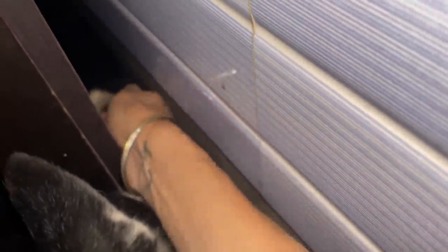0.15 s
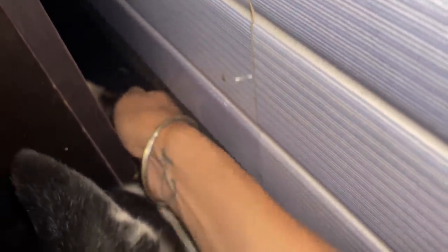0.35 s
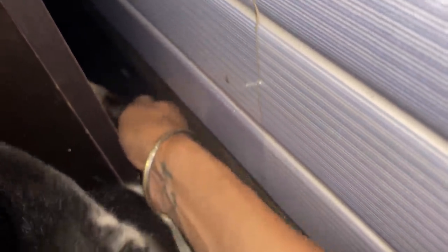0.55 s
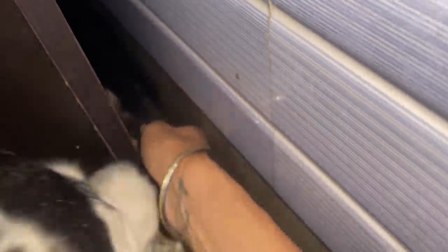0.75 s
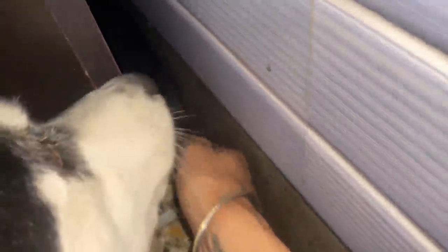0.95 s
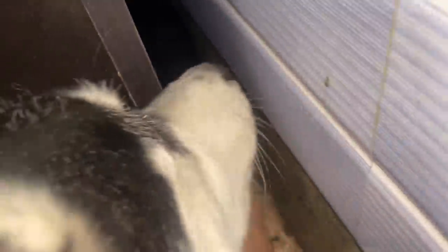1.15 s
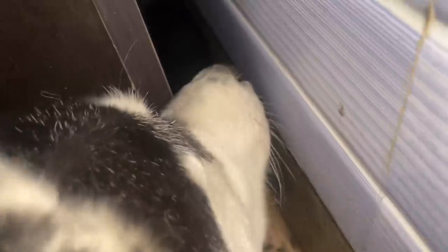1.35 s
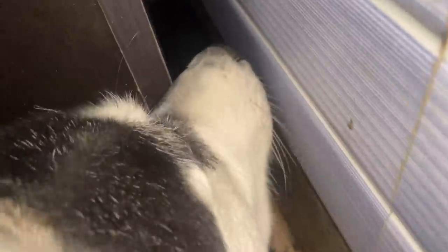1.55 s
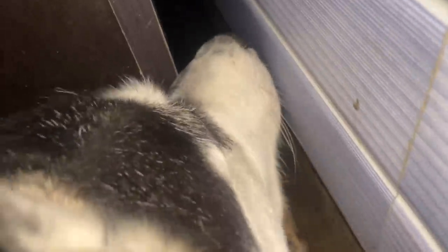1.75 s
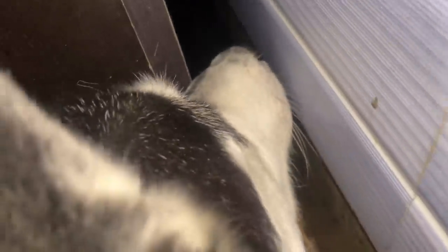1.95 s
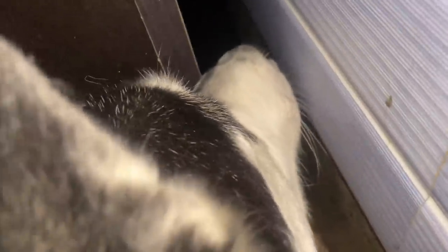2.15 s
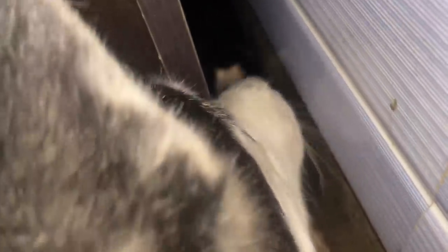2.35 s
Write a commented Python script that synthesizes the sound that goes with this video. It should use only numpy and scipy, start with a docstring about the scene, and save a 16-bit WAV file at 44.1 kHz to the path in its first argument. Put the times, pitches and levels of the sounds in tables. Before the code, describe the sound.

A very young puppy gives a long high squeal that turns clear then raspy, while a wooden panel is bumped softly; a faint peep leads to a second shorter cry. Close stereo microphone, quiet room.

```python
"""A newborn puppy, stuck in a narrow gap between furniture and a wall, squeals twice: the first cry starts
period-doubled, turns clear, then breaks into a rasp; a faint peep leads into the second. Uneven fold pulses
pass through throat and mouth, with hissing breath beside them. A bumped wooden panel shudders as decaying
modes, a claw ticks on the floor, and filtered noise makes the quiet room and the rumble of movement."""
import sys
import numpy as np
from scipy import signal
from scipy.fft import rfft, irfft, next_fast_len
from scipy.io import wavfile
from scipy.ndimage import uniform_filter1d, minimum_filter1d, map_coordinates

SR = 44100
rng = np.random.default_rng(int(sys.argv[2]) if len(sys.argv) > 2 else 0)


def generate_wav(sig):
    """Save sig (samples, or channels by samples) to the path in sys.argv[1] as 16-bit PCM at SR."""
    pcm = np.round(np.clip(np.atleast_2d(sig).T, -1, 1) * 32767).astype(np.int16)
    wavfile.write(sys.argv[1], SR, pcm)


def volts_from_decibels(level):
    """Turn decibel levels (scalar or array-like) into linear amplitude factors."""
    exponent = np.asarray(level, float) / 20
    return 10 ** exponent


N = 105840


def unit(x):
    """Scale to rms 1."""
    return x / np.sqrt(np.mean(x ** 2) + 1e-20)


def along(points, hz):
    """Read (Hz, value) points on a log frequency axis."""
    f, v = np.transpose(points)
    return np.interp(np.log(hz + 1), np.log(f + 1), v)


def curves(rows):
    """One value per sample for each column after the time."""
    s, *cols = np.transpose(rows)
    return [np.interp(np.arange(N) / SR, s, c) for c in cols]


def wobble(rate):
    """A smooth random curve, rate knots a second."""
    return map_coordinates(rng.standard_normal(N // 8), [np.arange(N) * rate / SR])


def filtered(x, response):
    """Multiply the spectrum of x by a complex response of frequency."""
    m = next_fast_len(N + SR // 2)
    return irfft(rfft(x, m) * response(np.fft.rfftfreq(m, 1 / SR)), m)[..., :N]


def cry(pitch_rows, level_rows, count=24):
    """Fold pulses, uneven in time and size when irregular, through the throat; the mouth sets six band levels."""
    # state of the vocal folds: time_s, irregularity (0-1), every_second_pulse (depth), flutter (0-1)
    folds = [(0, .16, 4, .1), (.05, .09, 3, .1), (.125, .09, 1.5, 0), (.14, .08, .05, .1),
             (.24, .04, .02, .05), (.3, .01, 0, 0), (.815, .01, 0, 0), (.84, .16, 0, .2), (.89, .12, 0, .6),
             (.93, .3, 0, .8), (.955, .06, 0, .1), (.97, .18, 0, .8), (1.04, .18, 0, .8),
             (1.08, .08, 0, .4), (1.14, .35, 0, 1), (1.25, .55, 0, 1), (1.275, .03, 0, 0),
             (1.775, .6, 0, .3), (1.81, .5, 0, .3), (1.83, .05, 0, 0), (1.88, .04, .05, 0),
             (1.91, .09, .08, .1), (1.95, .02, 0, 0), (2.25, .012, 0, 0), (2.4, .025, 0, 0)]
    # resonances of the throat, relative within each band: frequency_hz, level_db
    throat = [(300, -50), (600, -29), (950, -27.5), (1500, -7), (1800, 5), (2150, 6), (2550, 8),
              (2900, -11), (3150, -9.5), (4100, -11.5), (4700, 1), (5500, 0.5), (6400, -20.5),
              (7600, -47.5), (9000, -35), (11500, -44.5), (13000, -75), (16000, -106.5)]
    # crossovers between the six bands: frequency_hz
    band_edges_hz = [1130, 2050, 2950, 3800, 7300]
    jitter_cycles, shimmer, rasp_per_s = .13, .4, 350  # pulse timing and size at full irregularity; knots a second
    # second vibration near a third of the pitch: its drift, pull on pulse timing (rad), pull on pulse size
    flutter_drift, flutter_bend, flutter_depth = .3, .4, .2
    narrow_hz, narrow_width_hz = 2220, 220  # the partial that a narrow mouth favours
    flicker_db, burst_db = 2, 1.6  # slow unsteadiness of each band; quick level jumps while the folds flutter

    pitch = uniform_filter1d(curves(pitch_rows)[0], size=450) * (1 + 0.005 * wobble(20))
    rough, second, flutter = curves(folds)
    turn = 2 * np.pi * np.cumsum(pitch) / SR
    slow = 2 * np.pi * np.cumsum(pitch / 3 * (1 + flutter_drift * wobble(70))) / SR
    jitter = 2 * np.pi * jitter_cycles * rough * wobble(rasp_per_s)
    uneven = turn + jitter + flutter_bend * flutter * np.sin(slow)

    pulses = sum(np.cos(k * uneven + k * k / 2) for k in range(1, count))
    pulses *= 1 + shimmer * rough * wobble(rasp_per_s)
    pulses *= 1 + second * np.cos(turn / 2) + flutter_depth * flutter * np.cos(slow)

    def throat_bands(hz):
        below = [0 * hz] + [1 / (1 + (hz / edge) ** 16) for edge in band_edges_hz] + [1 + 0 * hz]
        return volts_from_decibels(along(throat, hz)) * np.diff(below, axis=0)

    def narrow_mouth(hz):
        return 0.21 + 2 / (1 + ((hz - narrow_hz) / narrow_width_hz) ** 4)

    bands = filtered(pulses, throat_bands)
    narrow = np.clip(second, 0, 1)  # the mouth narrows while pulses alternate
    bands = (1 - narrow) * bands + narrow * filtered(bands, narrow_mouth)
    loud = np.sqrt(np.abs(uniform_filter1d(bands ** 2, size=1500)) + 1e-12)

    t = np.arange(N) / SR
    start_s, end_s = level_rows[0][0], level_rows[-1][0]
    # 4 ms fades, except where a cry is already sounding at 0 s or lasts beyond 2 s
    rise = t - start_s + (start_s == 0)
    fall = end_s - t + (end_s > 2)
    on = np.clip(np.minimum(rise, fall) / .004, 0, 1)

    bands[1:] *= volts_from_decibels(burst_db * flutter * wobble(rasp_per_s))
    flicker = flicker_db * np.array([wobble(29.777) for _ in bands])
    return (bands / loud * volts_from_decibels(curves(level_rows) + flicker)).sum(0) * on


def breath():
    """Air hissing past the puppy's vocal folds: coloured noise with an unsteady level."""
    # loudness of the breath: time_s, level_db
    breath_level = [(0, -46), (.06, -55), (.25, -60), (.33, -80), (1.82, -80), (1.89, -51), (1.95, -62),
                    (2.1, -80)]
    # colour of the hiss: frequency_hz, density_db (per Hz)
    breath_colour = [(1500, -37.5), (2300, -8), (4600, -13.5), (6900, 17), (7800, -39.5)]
    colour = breath_colour + [(9500, -120)]
    hiss = unit(filtered(rng.standard_normal(N), lambda hz: volts_from_decibels(along(colour, hz))))
    return hiss * volts_from_decibels(curves(breath_level)[0] + 4 * wobble(60))


def paths(rows, hz):
    """Response of several delayed copies (ms, gain), each turning phase in step with frequency."""
    return sum(gain * np.exp(-2j * np.pi * hz * ms / 1000) for ms, gain in rows)


def out_of_gap(x, lead, lean_db):
    """The voice reaches the two microphones by different ways between wall and furniture."""
    # ways out to each microphone: delay_ms, gain
    gap_left = [(0, 0.84), (.9, -0.53), (2.1, 0.39), (3.9, 0.41)]
    gap_right = [(0, 0.85), (2.3, -0.26), (3.9, -0.16)]

    def both_sides(hz):
        half = volts_from_decibels(lean_db / 2) * np.exp(.5j * np.interp(hz, *np.transpose(lead)))
        return np.array([paths(gap_left, hz) * half, paths(gap_right, hz) / half])

    return filtered(x, both_sides)


def room(x):
    """Reverberation from two noise tails in which each frequency dies at its own speed."""
    # decay of the room: frequency_hz, t60_s
    room_decay = [(100, 0.27), (500, 1), (2000, 0.36), (10000, 0.018)]
    hz, t, z = signal.stft(rng.standard_normal((2, SR // 2)), SR, nperseg=256)
    decay = volts_from_decibels(-60 * t / along(room_decay, hz)[:, None])
    tail = signal.istft(z * decay, SR, nperseg=256)[1]
    late = np.pad(x, (300, 0))[None]  # the tail starts 300 samples late
    return signal.fftconvolve(late, tail / np.linalg.norm(tail[0]), axes=1)[:, :N]


def background():
    """Room air as noise, most alike on both sides in the bass, and the rumble of bodies against the wood."""
    # colour of the room air: frequency_hz, density_db (per Hz, relative)
    air_colour = [(15, -83.5), (25, -31.5), (59, 2), (329, -10.5), (512, -6), (776, -21.5), (908, -16),
                  (1790, -19.5), (2710, -30.5), (12600, -50), (16400, -99), (22000, -120)]
    # left-right likeness of the air: frequency_hz, correlation
    likeness = [(60, 1), (230, 0.83), (850, -0.41), (3220, -0.31), (12100, 0.004)]
    # loudness of the low rumble: time_s, level_db
    shuffle_level = [(0.0, -35.5), (0.43, -44.5), (0.622, -33), (0.878, -42), (1.3, -76)]
    # colour of the rumble: frequency_hz, density_db (per Hz, relative)
    shuffle_colour = [(15, -69.5), (25, -30.5), (46, -2), (97, -4), (336, -22), (400, -14), (520, -52),
                      (880, -120)]
    air_db = -50.5  # rms of the part shared by both sides

    def mid_side(hz):
        angle = np.arccos(np.clip(along(likeness, hz), -1, 1)) / 2
        return volts_from_decibels(along(air_colour, hz)) * np.array([np.cos(angle), np.sin(angle)])

    mid, side = filtered(rng.standard_normal((2, N)), mid_side)
    air = volts_from_decibels(air_db) * np.array([mid + side, mid - side]) / mid.std()
    rumble = unit(filtered(rng.standard_normal(N), lambda hz: volts_from_decibels(along(shuffle_colour, hz))))
    return air + rumble * volts_from_decibels(curves(shuffle_level)[0] + 1.2 * wobble(2.4))


def bump():
    """Soft blows ring the panel's low modes, each blow a little differently; weaker blows are duller."""
    # blows on the panel: start_s, level_db
    blows = [(0.443, -9), (0.453, -2), (0.471, -11), (0.499, -14), (0.552, -14), (0.63, -27.5),
             (0.711, -24), (0.756, -26)]
    # modes of the wooden panel before scatter: frequency_hz, level_db, t60_s
    panel = [(60.4, -24, 0.14), (95.3, -10, 0.48), (125.6, 1.5, 0.095), (147.5, 1.5, 0.093),
             (218.1, -5, 0.12), (311.6, -6, 0.078), (382, 4, 0.026), (504.4, -10.5, 0.06),
             (680.5, -17, 0.082), (1523, -19, 0.029)]
    duller, swell_s = .22, .004  # dB lost per octave for each dB that a blow is softer; rise of a soft blow
    scatter_db, detune = 2, .05  # blow-to-blow spread of mode level and of relative frequency

    out, t = np.zeros(N + SR), np.arange(SR // 2) / SR
    hardest_db = max(db for _, db in blows)
    for s, db in blows:
        tilt_db = duller * (db - hardest_db)
        ring = np.zeros(len(t))
        for hz, level, t60 in panel:
            mode_db = level + tilt_db * np.log2(hz / 100) + rng.normal(0, scatter_db)
            mode = np.sin(2 * np.pi * hz * rng.normal(1, detune) * t)
            ring += volts_from_decibels(mode_db - 60 * t / t60) * mode
        out[round(s * SR):][:len(t)] += volts_from_decibels(db) * ring * (1 - np.exp(-t / swell_s))
    return out[:N]


def tick():
    """A claw on the floor: a tiny bright click of noise that falls 60 dB in 8 ms."""
    # claw taps: start_s, level_db (before the colour filter)
    taps = [(2.319, -33)]
    colour = [(1500, -32), (4500, 19.5), (9000, -9), (13000, -39)]  # frequency_hz, gain_db
    out, t = np.zeros(N), np.arange(400) / SR
    for s, db in taps:
        out[round(s * SR):][:len(t)] += volts_from_decibels(db - 60 * t / .008) * rng.standard_normal(len(t))
    return filtered(out, lambda hz: volts_from_decibels(along(colour, hz)))


def scene():
    """Mix the puppy heard through the gap, the bumped panel, the claw tick and the room."""
    # pitch of the first cry, the peep and the second cry: time_s, pitch_hz
    pitch_1 = [(0, 621), (.05, 629.5), (.075, 670), (.135, 724), (.186, 711), (.235, 773.3), (.3, 823),
               (.358, 865.6), (.388, 865.8), (.45, 921), (.485, 919.3), (.575, 867), (.605, 875), (.7, 827),
               (.745, 819), (.85, 892.7), (.91, 953.3), (.95, 895), (.976, 900.5), (1.08, 927),
               (1.124, 960.3), (1.2, 949), (1.235, 859.4), (1.27, 701.6), (1.312, 620), (1.34, 483.3)]
    peep_pitch = [(1.784, 980), (1.815, 1002)]
    pitch_2 = [(1.81, 520), (1.822, 600), (1.834, 701), (1.846, 764), (1.862, 806), (1.886, 835),
               (1.9, 792), (1.915, 725), (1.94, 708.3), (1.96, 757), (1.982, 852), (2.02, 907.6),
               (2.11, 816), (2.2, 809.6), (2.292, 731.4), (2.352, 576.4), (2.4, 560)]
    # mouth levels of the same three, before flicker: time_s, then level_db of six bands, low to high
    cry_1 = [(0.0, -40.5, -29, -30, -54, -44.5, -69), (0.087, -41.5, -37, -36, -49.5, -69, -57),
             (0.18, -44, -34, -32.5, -63, -60.5, -57), (0.245, -48, -43, -16, -48.5, -68, -44.5),
             (0.302, -49, -31, -23.5, -29.5, -45, -40.5), (0.392, -38.5, -24.5, -15.5, -25.5, -39, -40.5),
             (0.47, -29.5, -17, -27.5, -57.5, -33.5, -32.5), (0.506, -33.5, -21.5, -36, -43, -39.5, -39),
             (0.584, -30, -25.5, -25, -33, -31, -45), (0.793, -43, -24.5, -13.5, -56, -36, -39),
             (0.83, -30, -21.5, -19.5, -30.5, -31, -36.5), (1.016, -35.5, -37.5, -22, -45.5, -33, -34.5),
             (1.096, -33, -11.5, -22, -53, -23.5, -32.5), (1.121, -32.5, -22.5, -15, -39.5, -30.5, -39),
             (1.268, -48, -39, -22, -46, -38.5, -50.5), (1.326, -46, -53, -42, -58.5, -60, -56.5),
             (1.349, -78.5, -101, -88, -100, -106.5, -102)]
    peep = [(1.785, -38, -55, -43, -67, -77, -69), (1.819, -47.5, -58, -66.5, -57.5, -73.5, -73.5)]
    cry_2 = [(1.811, -46, -48, -68, -84, -65, -70), (1.839, -47.5, -25, -15, -37, -43.5, -40.5),
             (1.876, -37.5, -35, -25.5, -18.5, -27, -33), (1.922, -46.5, -41, -16, -31.5, -28, -53.5),
             (1.954, -44.5, -37, -21.5, -45, -55, -50), (1.98, -39.5, -48, -36, -39, -90, -57.5),
             (2.016, -33.5, -25, -20.5, -28.5, -30, -31), (2.045, -34.5, -34, -14, -32.5, -23.5, -39.5),
             (2.086, -47, -54, -23.5, -43, -35.5, -47.5), (2.15, -48.5, -41.5, -34, -37, -37, -52.5),
             (2.225, -53, -49, -53, -27.5, -52, -53.5), (2.269, -52, -38.5, -20.5, -34, -49, -53.5),
             (2.354, -47, -46, -81, -49.5, -74, -65.5), (2.4, -34, -53, -59, -39, -59, -59.5)]
    # how far the left side leads the right in each cry, before the gap's paths: frequency_hz, lead_rad
    lead_1 = [(0, 11), (430, -1), (950, 8), (2070, -4), (3530, -8), (5170, -22), (6370, -22.5),
              (12300, -18.5)]
    lead_2 = [(500, -1.5), (800, 1.5), (1550, -2.5), (2000, -1.5), (2400, -5.5), (3200, -8), (3900, -12),
              (5100, -20), (6400, -23), (12000, -48.5)]
    lean_1_db, lean_2_db = -3, -4  # left over right, before the gap's paths
    wet_db, bump_wet_db, bump_lag_ms = -31, -22, 0.2  # reverb of voice and panel; panel's delay on the right

    first = cry(pitch_1, cry_1) + breath()
    second = cry(peep_pitch, peep) + cry(pitch_2, cry_2) + tick()
    knock = bump()

    near = out_of_gap(first, lead_1, lean_1_db) + out_of_gap(second, lead_2, lean_2_db)
    near += filtered(knock, lambda hz: np.array([1 + 0j * hz, paths([(bump_lag_ms, .95)], hz)]))
    voice_echo = volts_from_decibels(wet_db) * room(first + second)
    echo = room(knock)
    knock_echo = volts_from_decibels(bump_wet_db) * (echo + echo.mean(0))  # the mean pulls it toward the centre
    return near + voice_echo + knock_echo + background()


def top_cut(x):
    """Nothing passes above the cut-off."""
    return signal.sosfilt(signal.butter(12, 12730, fs=SR, output="sos"), x)


def record(dry):
    """The microphone drops the deepest bass, then a limiter holds the peaks."""
    mic_low_hz, ceiling = 52, .9  # corner of each of two high-pass stages; the limiter's top
    x = filtered(dry, lambda hz: (1j * hz / (1j * hz + mic_low_hz)) ** 2)
    need = np.minimum(1, ceiling / (np.abs(x).max(0) + 1e-9))
    gain = uniform_filter1d(minimum_filter1d(need, size=801), size=400)
    return top_cut(x * gain)


dry = scene()
out = record(dry)
generate_wav(out)
```